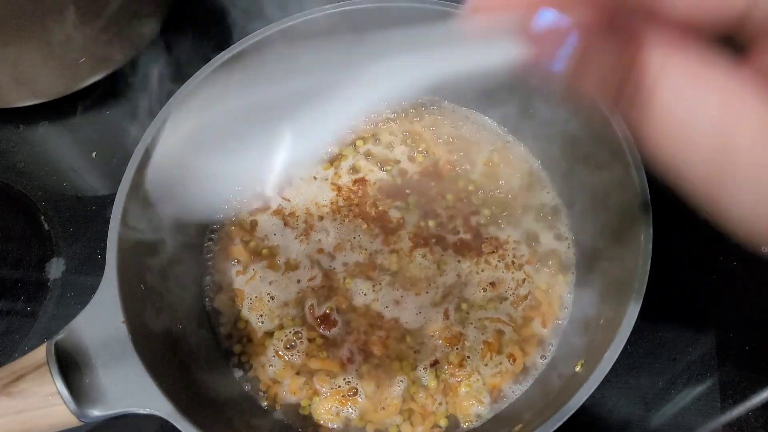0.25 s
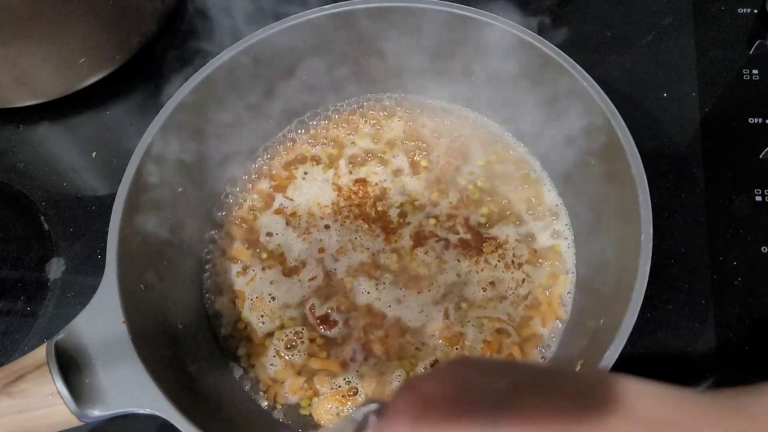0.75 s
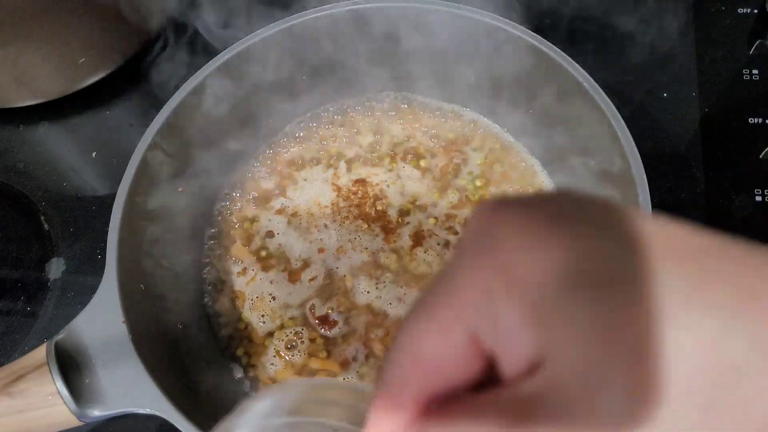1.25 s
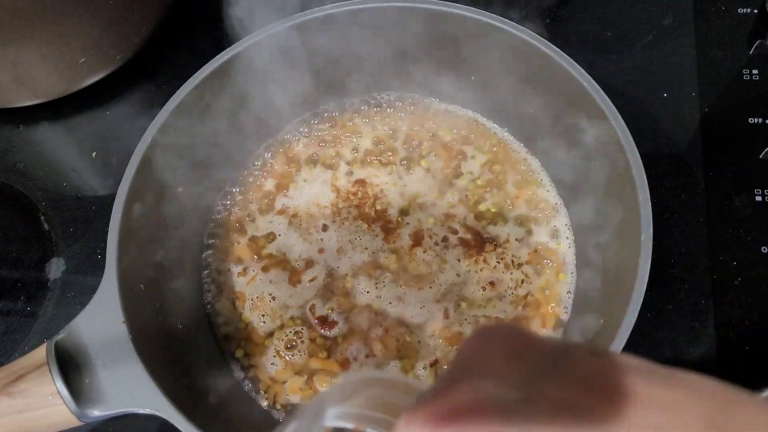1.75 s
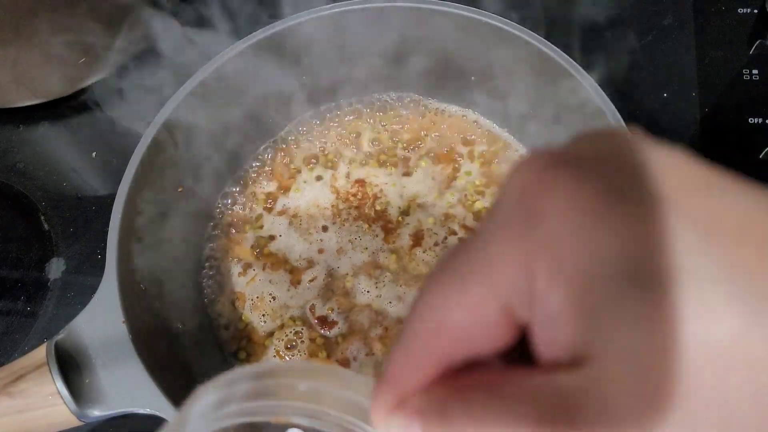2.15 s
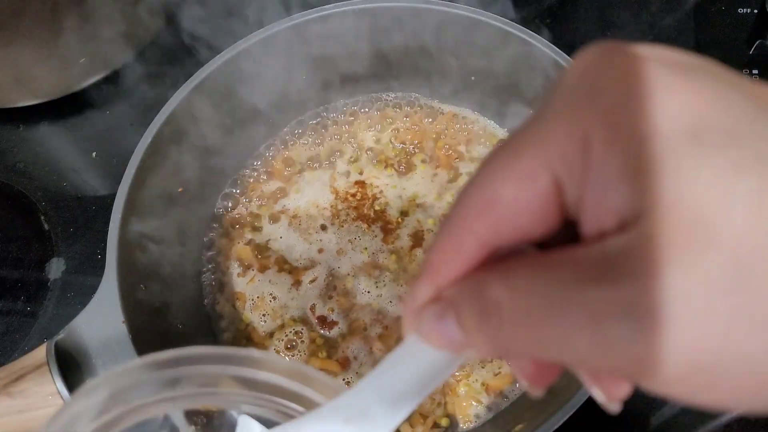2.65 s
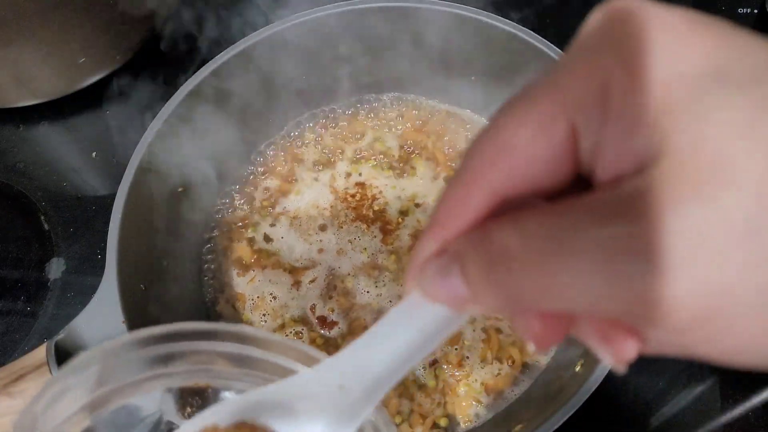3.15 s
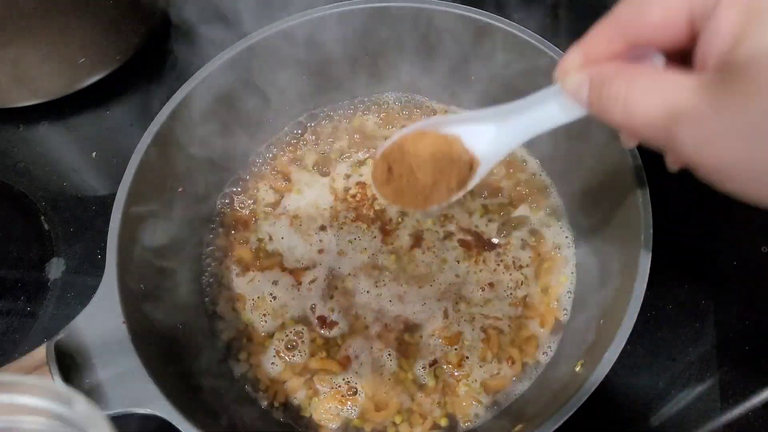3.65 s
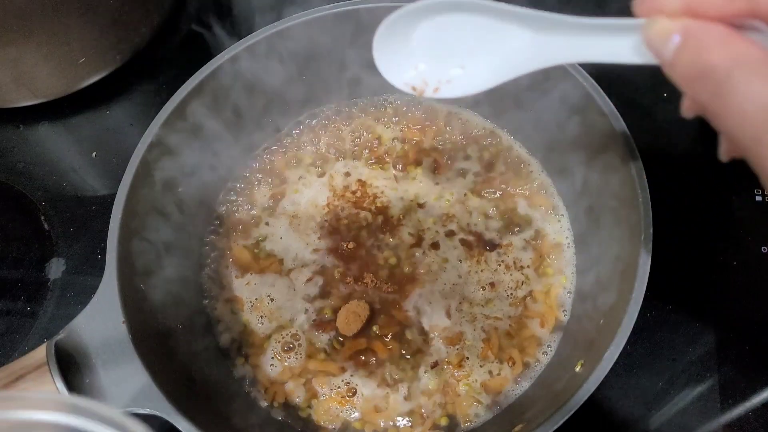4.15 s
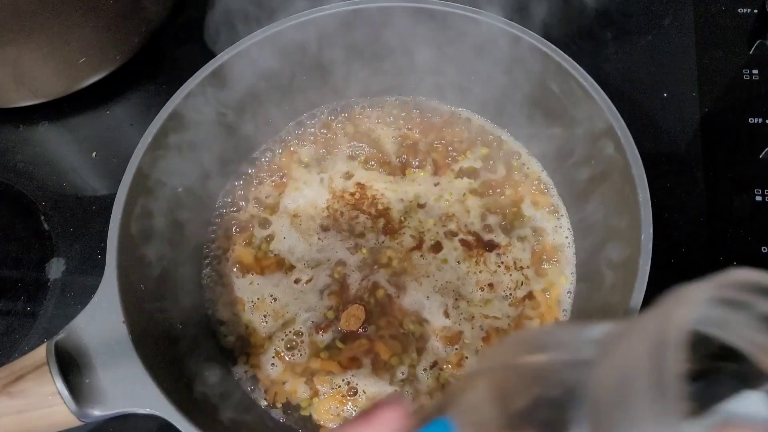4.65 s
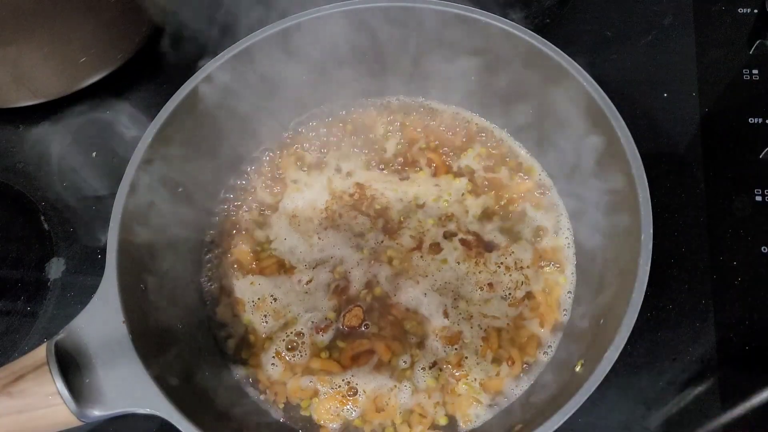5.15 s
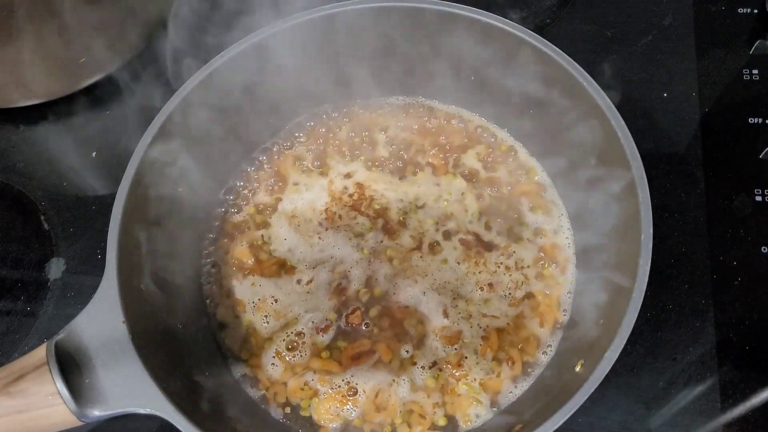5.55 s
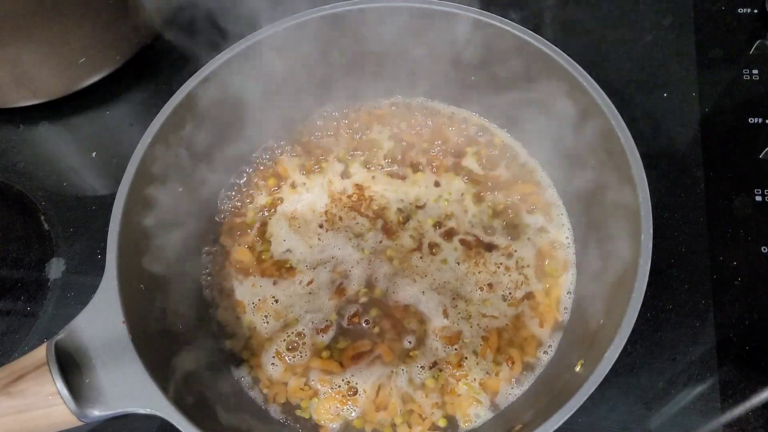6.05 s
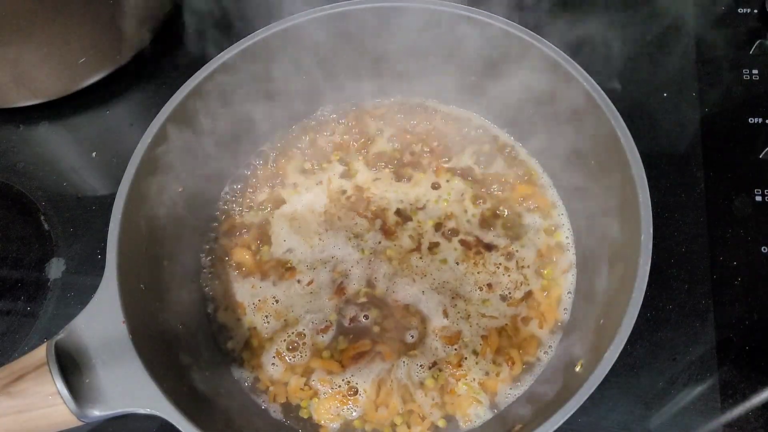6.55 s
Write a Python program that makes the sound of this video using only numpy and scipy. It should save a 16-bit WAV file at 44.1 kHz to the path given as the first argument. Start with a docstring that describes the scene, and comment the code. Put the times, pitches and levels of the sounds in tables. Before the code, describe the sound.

Broth simmers softly in a pan while a spoon knocks and scrapes in a plastic jar, which is then lidded and put away.

```python
"""A thick broth simmers throughout: bubbles drum on the pan and pop over a soft hiss and a wavering hum.
From 0.5 s, close on the right, a hand works a spoon in a plastic jar: the wall knocks and drags,
the spoon clinks, powder pours off it in tiny grains. The hardest knocks come at 4.7 s.
From 5.2 s a lid is tapped on; from 5.7 s the jar is put away on a shelf with dull thuds."""
import sys
import numpy as np
from scipy import signal
from scipy.io import wavfile

SR = 44100
rng = np.random.default_rng(int(sys.argv[2]) if len(sys.argv) > 2 else 0)


def inscribe(sig):
    """Save sig as 16-bit PCM at rate SR to the path in sys.argv[1].

    A 1-D sig is mono; a 2-D sig holds one channel per row.
    Samples are clipped to [-1, 1] before scaling.
    """
    pcm = np.round(np.clip(np.atleast_2d(sig).T, -1, 1) * 32767)
    wavfile.write(sys.argv[1], SR, pcm.astype(np.int16))


N = 299880


def amp(db):
    return 10 ** (np.asarray(db) / 20)


def unit_rms(x):
    return x / np.sqrt(np.mean(x ** 2) + 1e-20)


def butter(x, order, hz, kind="band"):
    return signal.sosfilt(signal.butter(order, hz, kind, fs=SR, output="sos"), x)


def balance(pan_db):
    """Stereo gains; pan is left minus right."""
    return amp(pan_db * np.array([[.5], [-.5]]))


def delay_left(x, samples):
    """Sound from the right reaches the left side late."""
    return np.array([np.interp(np.arange(N) - samples, np.arange(N), x[0]), x[1]])


def curve(rows):
    """First value column of a time table, per sample."""
    return np.interp(np.arange(N) / SR, *np.transpose(rows)[:2])


def at_hz(rows, hz):
    """Spectrum lookup on a log-frequency axis."""
    freqs, values = np.transpose(rows)
    return np.interp(np.log(hz), np.log(freqs), values)


def ms_to_samples(x):
    return np.interp(np.arange(N) / SR, np.arange(len(x)) / 1000, x)


def strokes(times, hold_s, level_db, rise_db_per_s, fade_db_per_s):
    """Rise-hold-fade gains: a row per millisecond, a column per stroke."""
    t = np.arange(0, N / SR, .001)[:, None]
    before_s, after_s = np.maximum(times - t, 0), np.maximum(t - times - hold_s, 0)
    return amp(level_db - rise_db_per_s * before_s - fade_db_per_s * after_s)


def drift(rate_hz):
    """Slow random wander, rms 1."""
    hop = 40
    r = np.exp(-2 * np.pi * rate_hz * hop / SR)
    slow = signal.lfilter([1], [1, -2 * r, r * r], rng.standard_normal(N // hop + 2002))[2000:]
    return np.interp(np.arange(N) / hop, np.arange(len(slow)), unit_rms(slow))


def grains(per_s, spread_db):
    """Random clicks of uneven size."""
    sizes = amp(spread_db * np.minimum(rng.exponential(1, N), 4.0)) * rng.choice([-1, 1], N)
    return sizes * (rng.random(N) < per_s / SR)


def blows(times, pan_db, level_db):
    """Stereo click train."""
    clicks = np.zeros((2, N))
    clicks[:, np.round(times * SR).astype(int)] = amp(level_db) * balance(pan_db)
    return clicks


def ring(clicks, hz, t60_s):
    """One mode: each click starts a decaying sine of its own height."""
    r, w = amp(-60 / (t60_s * SR)), 2 * np.pi * hz / SR
    return signal.lfilter([0, np.sin(w)], [1, -2 * r * np.cos(w), r * r], clicks + 1e-18)


def crack(clicks, t60_s, band_hz):
    """Contact snap: a fast-dying noise burst per click."""
    envelope = signal.lfilter([1], [1, -amp(-60 / (t60_s * SR))], clicks)
    noise = rng.standard_normal(N) + 0.71 * rng.standard_normal((2, N))
    return butter(envelope * noise, 2, band_hz)


def drag(modes, drags, fade_db_per_s, clicks_per_s, pan_db):
    """Sliding contact feeds a body's modes with dense small clicks."""
    gains = strokes(*np.transpose(drags), rise_db_per_s=1500, fade_db_per_s=fade_db_per_s)
    friction = ms_to_samples(gains.sum(1)) * amp(2.0 * drift(37)) * grains(clicks_per_s, spread_db=1.5)
    rings = sum(amp(db) * ring(np.roll(friction, 31 * k), hz, t60_s)
                for k, (hz, db, t60_s) in enumerate(modes))
    return rings * balance(pan_db)


def strike(modes, times, pan_db, drive_db, ring_share, contact_cycles):
    """Blow k drives each mode at drive_db(hz, k); the grip cuts its t60 to ring_share[k]."""
    hz, mode_db, t60_s = np.transpose(modes)[:, :, None]
    scatter_db = rng.normal(0, 1.2, (len(times), len(modes), 1))
    out, t = np.zeros((2, N)), np.arange(SR // 5) / SR
    swell = 1 - np.exp(-hz * t / contact_cycles)   # contact takes time
    for k, start_s in enumerate(times):
        decay_db = -60 * t / (t60_s * ring_share[k])
        envelopes = amp(drive_db(hz, k) + mode_db + scatter_db[k] + decay_db) * swell
        rings = (envelopes * np.sin(2 * np.pi * hz * t)).sum(0)
        at = round(start_s * SR)
        out[:, at:at + len(t)] += rings[:N - at] * balance(pan_db[k])
    return out


def kitchen(send, t60_s=0.29, wall_cut_hz=6600):
    """Wall echoes: six feedback delays a side, duller each round."""
    out, pole = np.zeros((2, N)), np.exp(-2 * np.pi * wall_cut_hz / SR)
    for k, lag in enumerate((rng.uniform(0.011, 0.036, 12) * SR).astype(int)):
        loop, gain, state = send.copy(), amp(-60 * lag / SR / t60_s), [0.]
        for i in range(lag, N, lag):
            back, state = signal.lfilter([gain * (1 - pole)], [1, -pole], loop[i - lag:i], zi=state)
            loop[i:i + lag] += back[:N - i]
        out[k % 2] += (loop - send) * (-1) ** (k // 2)
    return out


# hum envelope: (time [s], level [dB])
HUM_LEVEL = [(0.0, -58), (0.07, -76), (0.95, -60), (1.25, -81), (1.29, -68.5), (2.86, -85.5), (2.93, -54),
             (3.14, -66), (4.05, -56), (4.15, -71), (4.7, -62), (4.75, -53), (5.13, -74.5), (6.21, -80),
             (6.36, -58), (6.46, -71), (6.55, -54), (6.8, -86)]


def hum(centre_hz=62.5, waver_hz=2.58):
    """Low tone; the pitch wavers, the level throbs."""
    hz = centre_hz + waver_hz * drift(8.7)
    gain = amp(curve(HUM_LEVEL) + 2.0 * drift(51))
    tone = gain * np.sqrt(2) * np.sin(2 * np.pi * np.cumsum(hz) / SR)
    return delay_left(tone * balance(-1.6), samples=41)


# simmer noise: (frequency [Hz], relative density [dB])
HISS_SPECTRUM = [(15, -38), (25, -28), (70, 1), (166, -10), (326, 4), (394, -27), (503, 2.5), (714, -9.5),
                 (1160, -28), (1370, -11), (2000, -17), (7920, -20), (16000, -33.5)]
# its stereo image: (frequency [Hz], left-right correlation [-1..1])
HISS_CORRELATION = [(60, 0.78), (180, 1), (550, 0.41), (1650, -0.67), (4970, -0.086), (15000, -0.81)]


def hiss(flicker_db=2.0):
    """Soft hiss of the broth in flickering half-octave bands, rms 1."""
    out, common, edges_hz = 0, drift(33), 25 * 2 ** np.arange(0, 9.6, .5)
    white = rng.standard_normal((2, 2, N))
    for k, (low, high) in enumerate(zip(edges_hz, edges_hz[1:])):
        mid, side = butter(white[k % 2], 2, [low, high])
        hz = np.sqrt(low * high)
        alike = np.clip(at_hz(HISS_CORRELATION, hz), -1, 1)
        gain = amp(at_hz(HISS_SPECTRUM, hz) - flicker_db * (0.18 * common + drift(25)))
        out += gain * (np.sqrt(1 + alike) * mid + np.sqrt(1 - alike) * side * [[1], [-1]])
    return unit_rms(out)


# pan resonances: (frequency [Hz], bandwidth [Hz], relative level [dB])
PAN_MODES = [(323, 15.3, -1.5), (503.4, 23.5, -5), (640, 31, -8.5), (1118, 190, -12.5), (1970, 350, -12)]


def pan_rumble():
    """Bubbles collapsing on the hot bottom drum on the pan's modes."""
    collapses = unit_rms(grains(1500, spread_db=2.0)) * amp(1.8 * drift(15))
    out = 0
    for k, (hz, width_hz, db) in enumerate(PAN_MODES):
        t60_s = np.log(1000) / (np.pi * width_hz)
        out += amp(db) * unit_rms(ring(np.roll(collapses, 57 * k), hz, t60_s))
    return out


# simmer envelope: (time [s], level [dB])
SIMMER_LEVEL = [(0.0, -56.5), (0.42, -61), (0.74, -54), (1.21, -61.5), (1.72, -56), (2.25, -61.5),
                (6.8, -62)]


def simmer():
    """Hiss and pan rumble swell and sink together."""
    return amp(curve(SIMMER_LEVEL)) * (hiss() + pan_rumble() * amp([[-3.5], [-2.5]]))


# big bubbles: (time [s], strength [dB])
BIG_POPS = [(0.2879, -43.5), (0.3395, -47.5), (1.752, -48.5), (2.0646, -52), (2.274, -48), (2.5297, -44),
            (2.646, -46.5), (2.7095, -48.5), (2.818, -53), (2.8918, -47), (2.9926, -44.5), (3.0377, -47),
            (3.0776, -46.5), (3.1202, -48), (3.4581, -47), (3.7227, -47.5), (3.8516, -54), (3.941, -48),
            (3.9789, -55), (4.048, -46), (4.1018, -47.5), (4.1583, -50.5), (4.587, -51.5), (5.1827, -48),
            (5.2978, -57), (6.1734, -49), (6.2115, -45), (6.2696, -46.5)]
# air in the pan: (frequency [Hz], gain [dB], t60 [s])
AIR_MODES = [(1196, -2.5, 0.02), (1600, -13, 0.0063), (2067, -10.5, 0.014), (2710, -4.5, 0.0055),
             (3720, -8.5, 0.0021)]


def pops(scatter_db=4.5):
    """Bursting bubbles ring the air in the pan: small ones at random, big ones as listed."""
    times, db = np.transpose(BIG_POPS)
    bursts = amp(-61) * np.abs(grains(62 * amp(3.2 * drift(1)), spread_db=2.0))
    bursts[np.round(times * SR).astype(int)] += amp(db)
    out = sum(ring(bursts * amp(mode_db + scatter_db * rng.standard_normal(N)), hz, t60_s)
              for hz, mode_db, t60_s in AIR_MODES)
    # the smallest ring a few cycles at their own pitches
    fizz = amp(-66.5) * grains(200 * amp(5.2 * drift(9.3)), spread_db=4.5)
    pitch_index = rng.integers(0, 10, N)
    for k, hz in enumerate(np.geomspace(900, 3800, 10)):
        out += ring(fizz * (pitch_index == k), hz, t60_s=12.7 / hz)
    return butter(out, 2, [600, 5000])


# hand, for rustle, spoon and jar: (time [s], pan [dB], gripped / free ring time [ratio])
HAND_PATH = [(0.0, 1, .35), (0.45, -4, 0.3), (0.8, -4, 0.24), (1.45, -5.5, 0.26), (1.7, -5.5, 0.47),
             (3.7, -4, 0.65), (4.4, 1, .6), (4.68, -8, 0.59), (4.72, -9, 0.54), (4.88, -4.5, 0.74),
             (5.8, -4.5, 0.85), (6.8, 8, 0.87)]
# fingers, spoon, pouring powder: (time [s], hold [s], level [dB], tilt [dB/octave])
RUSTLE_STROKES = [(0.06, 0.012, -71, 10), (0.516, 0.12, -58.5, 1.5), (0.65, 0.031, -71, -11.5),
                  (0.752, .02, -70, 4), (0.808, 0.032, -72, -9.5), (0.877, 0.1, -68.5, -4),
                  (1.187, 0.18, -79, 5), (1.52, 0.012, -54.5, 0), (1.657, 0.021, -60, -0.5),
                  (1.762, 0.03, -68.5, -6.5), (2.11, 0.045, -71, 7), (2.403, .04, -70.5, 2),
                  (2.88, 0.026, -76, -1), (3.738, 0.039, -65, 14), (3.88, 0.029, -66, 11),
                  (4.004, .02, -69.5, 6), (4.603, 0.016, -77.5, -6), (4.733, .005, -53.5, -0.5),
                  (4.773, .01, -59.5, -9), (4.834, .005, -66, -3.5), (5.624, 0.0071, -76.5, -7),
                  (5.683, 0.016, -82, -15), (5.83, 0.071, -76.5, -2.5), (6.308, .02, -75, 6),
                  (6.532, 0.0081, -73, -4), (6.643, 0.0069, -76, -2)]


def rustle(rest_db=-79.5, rest_db_per_octave=1.5):
    """Tiny grains in clumps; the tilt runs from dull rubbing to bright pouring."""
    times, hold_s, db, tilts = np.transpose(RUSTLE_STROKES)
    each = strokes(times, hold_s, db, rise_db_per_s=345, fade_db_per_s=206)
    gain = each.sum(1) + amp(rest_db)
    tilt = (each @ tilts + amp(rest_db) * rest_db_per_octave) / gain   # loudest stroke dominates
    gain, tilt = ms_to_samples(gain), ms_to_samples(np.clip(tilt, -8, 12))
    grit = unit_rms(grains(4000, spread_db=3.0)) + 1.12 * rng.standard_normal((2, N))
    out = 0
    for low_hz in 1600 * 2. ** np.arange(0, 3.5, 1 / 3):
        band = butter(grit, 1, [low_hz, low_hz * 2 ** (1 / 3)])
        octaves = np.log2(low_hz / 8000)
        out += band * amp(tilt * octaves - 1.3 * max(octaves, 0))
    clumps = amp(2.7 * drift(36))
    return out * gain * clumps * balance(curve(HAND_PATH))


# jar on shelf: (time [s], strength [dB], bottom mode [relative dB], upper modes [relative dB],
# damped / free ring time [ratio])
SHELF_THUDS = [(5.698, -43.5, 14, 3, 0.9), (5.974, -47.5, 21.5, -25, 0.47), (6.309, -38, -2, -13, 0.95),
               (6.321, -30.5, 0, -4.5, 0.8), (6.349, -40, -11, 4.5, 0.75), (6.451, -37.5, 6, -14, 0.63),
               (6.493, -39, -2, -1, 1), (6.533, -34, 6, -14, 0.8), (6.63, -35, -3, -17, 0.69),
               (6.647, -35, -4, -8, 0.37)]
# shelf resonances: (frequency [Hz], gain [dB], t60 [s])
SHELF_MODES = [(115.3, -21, 0.43), (235, 3, 0.094), (318.6, -2.5, 0.12), (457, -0.5, 0.098),
               (590, 12.5, 0.028), (1048, 16.5, 0.022), (1210, 17, 0.016), (1540, -3, 0.017),
               (2000, -2.5, 0.032)]
# sliding on the shelf: (time [s], hold [s], level [dB])
SHELF_DRAGS = [(6.314, 0.028, -56), (6.44, 0.022, -70), (6.489, 0.011, -62), (6.629, 0.016, -69.5)]


def shelf():
    """The jar thuds and slides on a shelf farther off."""
    times, db, bottom_db, upper_db, ring_share = np.transpose(SHELF_THUDS)
    pan_db = np.full(len(times), -1.2)

    def drive_db(hz, k):
        return db[k] + np.select([hz < 160, hz >= 800], [bottom_db[k], upper_db[k]])

    slides = drag(SHELF_MODES, SHELF_DRAGS, fade_db_per_s=237, clicks_per_s=1200, pan_db=-8.0)
    thuds = strike(SHELF_MODES, times, pan_db, drive_db, ring_share, contact_cycles=0.77)
    body = butter(slides + thuds, 4, 73, "high")
    scuff = crack(blows(times, pan_db, db + upper_db + 9.5), t60_s=0.046, band_hz=[710, 2130])
    snap = crack(blows(times, pan_db, db - 21.5), t60_s=0.046, band_hz=[3000, 18000])
    return delay_left(body + scuff + snap, samples=17.2)


# taps on the lid: (time [s], strength [dB], snap [relative dB])
LID_TAPS = [(5.25, -36.5, -20), (5.474, -51, -9), (5.483, -38, -22), (5.518, -35, -25), (5.629, -50.5, -14),
            (5.682, -53, -2), (5.692, -35, -14), (5.719, -47, -18), (5.886, -50.5, 3.5)]
# lid resonances: (frequency [Hz], gain [dB], t60 [s])
LID_MODES = [(635, -12, 0.03), (774, 11.5, 0.024), (874, -19, 0.19), (951, -3, 0.067), (1263, -11.5, 0.063),
             (1690, -10, 0.028), (2240, -15, 0.048), (3630, -21, 0.043)]
# thread friction: (time [s], hold [s], level [dB])
LID_TURNS = [(5.26, 0.058, -71), (5.49, 0.15, -68.5), (5.7, 0.14, -71.5)]


def lid():
    """A light lid, tapped and turned on its thread, rings freely."""
    times, db, snap_db = np.transpose(LID_TAPS)
    pan_db, ring_share = np.full(len(times), -.7), np.ones(len(times))
    turns = drag(LID_MODES, LID_TURNS, fade_db_per_s=120, clicks_per_s=460, pan_db=9.5)
    taps = strike(LID_MODES, times, pan_db, lambda hz, k: db[k], ring_share, contact_cycles=0.58)
    body = butter(turns + taps, 4, 420, "high")
    snap = crack(blows(times, pan_db, db + snap_db), t60_s=0.056, band_hz=[1490, 11300])
    return delay_left(body + snap, samples=2.4)


# spoon on jar wall: (time [s], strength [dB], tilt [dB/octave])
SPOON_CLINKS = [(0.468, -40, -19), (1.4925, -44, 9), (1.51, -52, 10), (1.519, -44, 8), (4.7135, -21, -1),
                (4.743, -44, 5), (4.845, -49, 11)]
# spoon resonances: (frequency [Hz], gain [dB], t60 [s])
SPOON_MODES = [(3740, -9, .03), (4380, -5, .045), (4700, -4.5, 0.041), (8120, -4.5, 0.032)]


def spoon():
    """A glazed spoon rings briefly on the jar, brighter when struck toward the tip."""
    times, db, tilt = np.transpose(SPOON_CLINKS)
    pan_db = np.interp(times, *np.transpose(HAND_PATH)[:2])
    scatter_db = rng.normal(0, 4, (len(times), len(SPOON_MODES)))
    out = 0
    for k, (hz, mode_db, t60_s) in enumerate(SPOON_MODES):
        level_db = db + mode_db + tilt * np.log2(hz / 4400) + scatter_db[:, k]
        out += ring(blows(times, pan_db, level_db), hz, t60_s)
    return delay_left(out, samples=12.6)


# knocks on the jar: (time [s], strength [dB], low modes [relative dB], upper modes [relative dB],
# snap [relative dB])
JAR_KNOCKS = [(0.469, -24.5, -6, -2, -16.5), (0.483, -25.5, -4, -12, -19), (0.516, -33, -20, -7, -20),
              (0.528, -29.5, -5, -7, -19), (0.757, -37, -13, -3, -8), (0.766, -35, -9, -3.5, -27),
              (0.799, -37, -23, -2.5, -9), (0.838, -29.5, -24, -11.5, -25), (0.975, -39.5, -16, 0, -13),
              (1.037, -48, 13.5, 1.5, -25), (1.455, -17, -2, -10.5, -19), (1.488, -38, -1, -12, 0),
              (1.503, -33, 3, -20, -6), (1.51, -40.5, -21, 5.5, 4), (1.518, -36, -8, -3, 3.5),
              (1.532, -18.5, -3, -12.5, -19), (1.69, -26.5, -32, -13, -22), (1.992, -46, -15, -2.5, -7),
              (3.665, -45.5, -0.5, -25, -30), (3.814, -48.5, 8, -13, -28), (4.684, -11, -18, -7, -14),
              (4.7135, -17, 5.5, -3, -4), (4.723, -18, -27, -20, -15), (4.739, -26, -16, -1.5, -4.5),
              (4.772, -22, 6, -6, -8), (4.8, -31.5, 8.5, -1.5, -2), (4.821, -33.5, -2, -9, -5),
              (4.847, -30.5, -21, -7.5, -7), (5.798, -48.5, -21, -25, -18), (5.813, -43.5, -16, -29, -7),
              (5.859, -46.5, -8, -17, -20), (5.904, -47.5, 2, 0, -11)]
# jar resonances: (frequency [Hz], gain [dB], t60 [s])
JAR_MODES = [(272.4, -1.5, 0.083), (326, 0, 0.08), (419, -4.5, 0.095), (525.4, 6, 0.069), (680, -8, 0.071),
             (885, -0.5, 0.021), (1300, 2.5, 0.005), (1600, 12.5, 0.0067), (2260, -9, 0.016)]
# dragging on the jar: (time [s], hold [s], level [dB])
JAR_DRAGS = [(0.522, 0.039, -53.5), (0.768, 0.056, -63), (0.824, .01, -56.5), (1.48, 0.062, -60.5),
             (1.726, 0.048, -65), (1.87, 0.04, -77), (4.724, 0.0044, -63), (4.769, 0.0044, -53),
             (5.795, 0.19, -77.5)]


def jar():
    """Hand-damped plastic jar; each knock drives low, middle and upper modes in its own mix."""
    times, db, low_db, upper_db, snap_db = np.transpose(JAR_KNOCKS)
    hand_s, hand_pan_db, hand_share = np.transpose(HAND_PATH)
    pan_db, ring_share = np.interp(times, hand_s, hand_pan_db), np.interp(times, hand_s, hand_share)

    def drive_db(hz, k):
        return db[k] + np.select([hz < 400, hz >= 700], [low_db[k], upper_db[k]])

    scrapes = drag(JAR_MODES, JAR_DRAGS, fade_db_per_s=137, clicks_per_s=490, pan_db=-2.5)
    knocks = strike(JAR_MODES, times, pan_db, drive_db, ring_share, contact_cycles=0.42)
    body = butter(scrapes + knocks, 4, 213, "high")   # a small body radiates no deep bass
    scuff = crack(blows(times, pan_db, db + upper_db + 8.0), t60_s=0.047, band_hz=[795, 2240])
    snap = crack(blows(times, pan_db, db + snap_db), t60_s=0.025, band_hz=[3050, 14600])
    return delay_left(body + scuff + snap, samples=12)


def scene():
    """Pan, hands and room."""
    bubbles, far = pops(), shelf()
    near = jar() + spoon() + lid()
    broth = simmer() + bubbles * balance(-3)
    echo = kitchen(amp(-18) * near.mean(0) + amp(-15.5) * far.mean(0) + amp(-13) * bubbles)
    return broth + near + far + rustle() + hum() + echo


def record(dry):
    """Steep low-pass, 70 dB down from 15950 Hz."""
    return signal.sosfilt(signal.cheby2(22, 70, 15950, fs=SR, output="sos"), dry)


dry = scene()
out = record(dry)
inscribe(out)
```